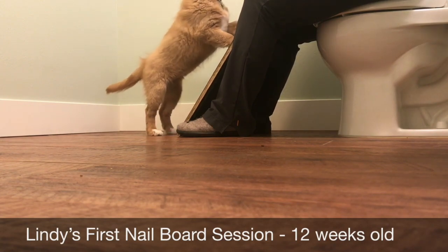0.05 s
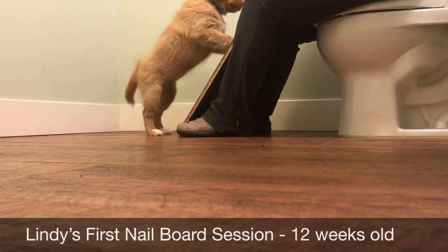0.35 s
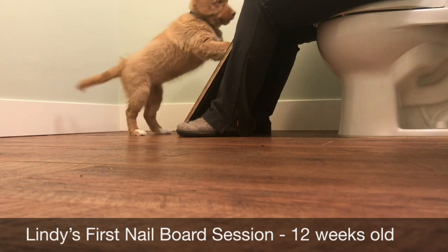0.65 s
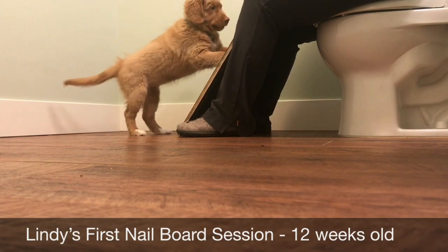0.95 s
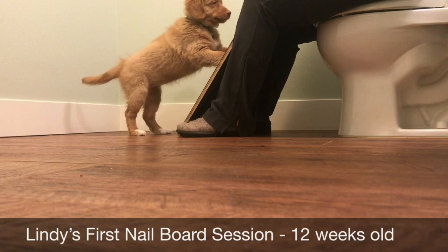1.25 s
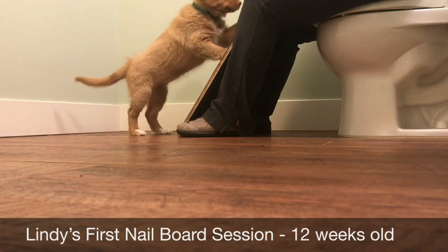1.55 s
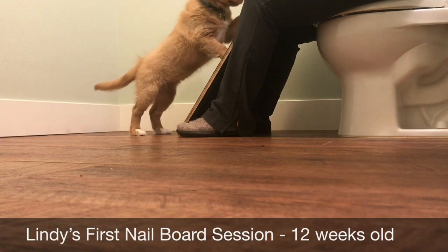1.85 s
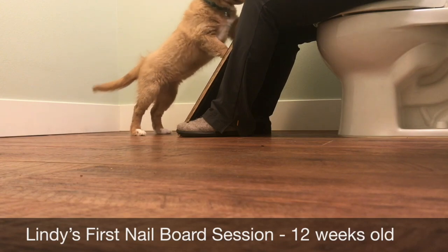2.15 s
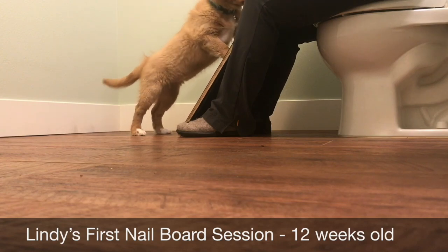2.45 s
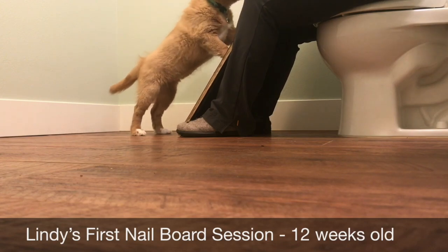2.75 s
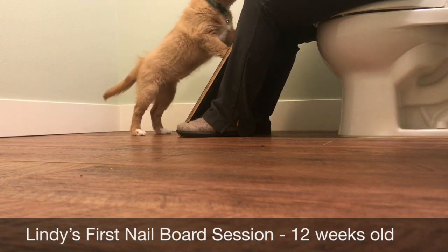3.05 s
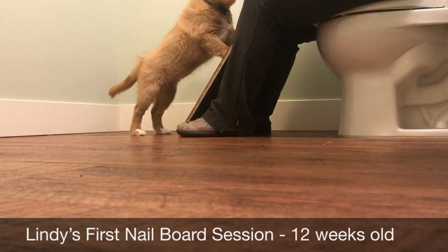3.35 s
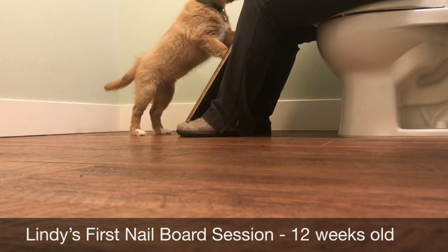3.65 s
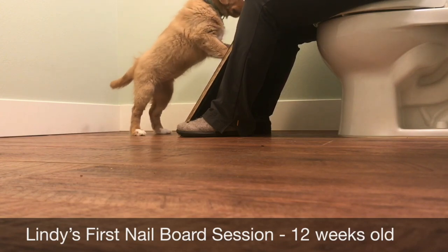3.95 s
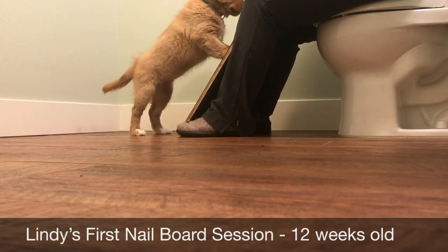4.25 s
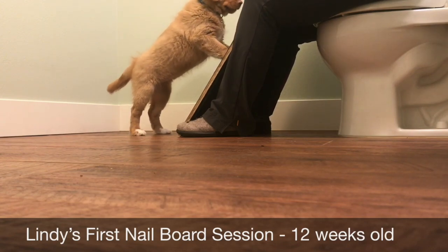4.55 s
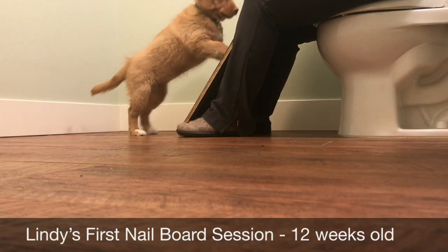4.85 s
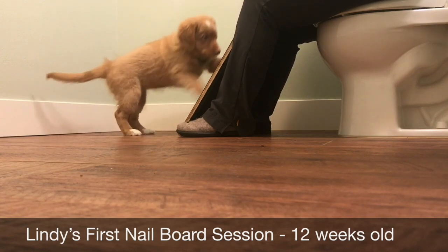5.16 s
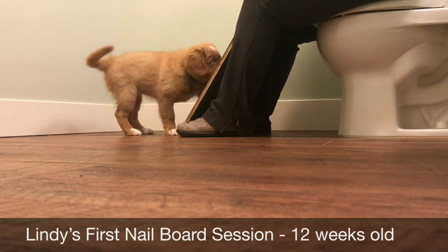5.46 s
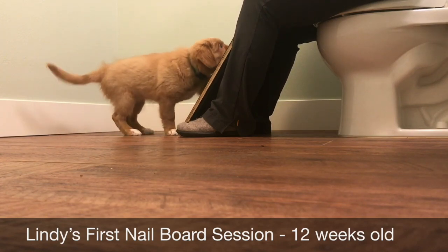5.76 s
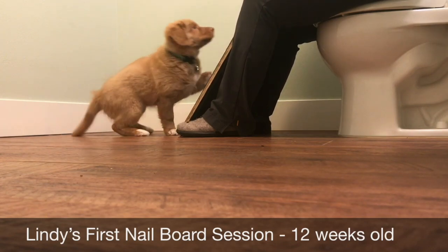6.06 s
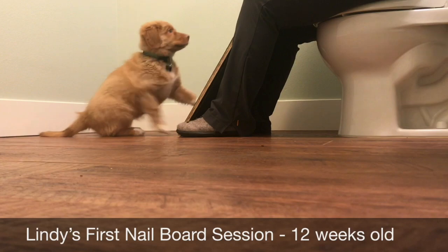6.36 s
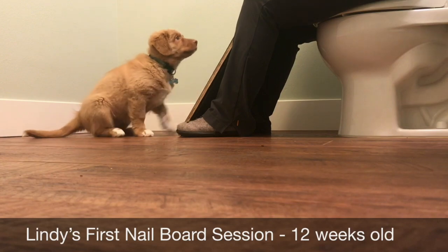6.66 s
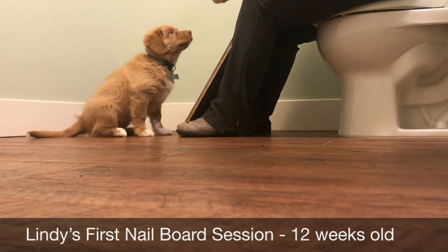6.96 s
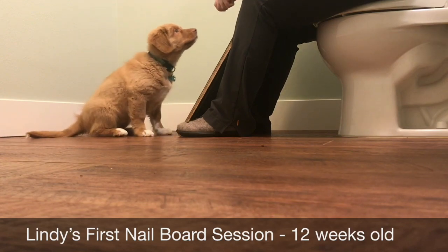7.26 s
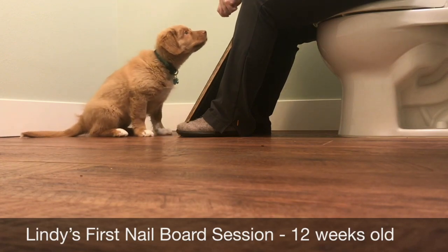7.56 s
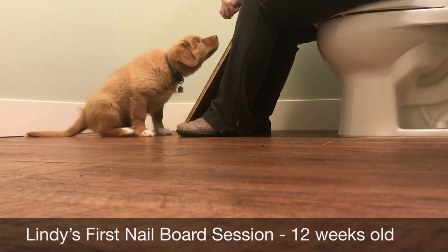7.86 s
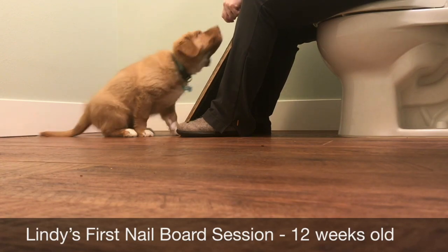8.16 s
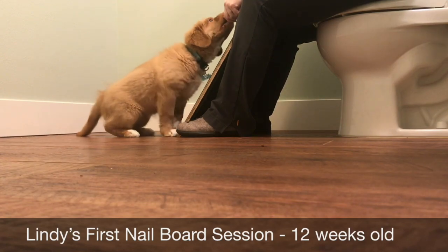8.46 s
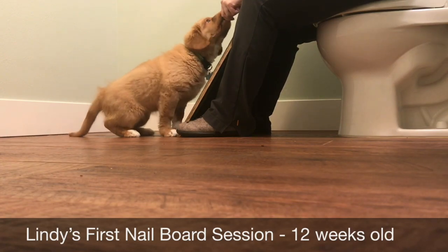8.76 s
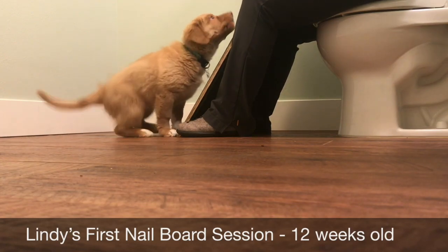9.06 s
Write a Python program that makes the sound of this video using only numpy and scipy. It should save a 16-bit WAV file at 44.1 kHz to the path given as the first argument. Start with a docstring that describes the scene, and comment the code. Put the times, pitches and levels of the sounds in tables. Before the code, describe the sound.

In a small, reverberant bathroom, a puppy's claws scratch a gritty board while its paws thump softly against it. A clicker snaps loudly down and up, then the scratching thins to light ticks and small lip smacks. The scraping builds again until a second double click, and ends in gentle knocks and a last few smacks. Faint room hiss lies underneath.

```python
"""Claws rasp and tick on grit as a puppy paws at a sandpaper-faced board leaning on its trainer's legs.
Stick-slip friction rings the board, while the paws' weight thumps its lowest modes. Twice the steel
tongue of a training clicker buckles down and springs back. Small wet mouth smacks come in between,
and a few soft knocks, most near the end. All but the thumps reverberate in a small, hard-walled
bathroom, over a faint rumble and hiss."""
import sys
import numpy as np
from scipy import signal
from scipy.fft import rfft, irfft
from scipy.io import wavfile

SR = 44100
rng = np.random.default_rng(int(sys.argv[2]) if len(sys.argv) > 2 else 0)


def generate_wav(sig):
    """Save sig (samples, or channels by samples) to the path in sys.argv[1] as 16-bit PCM at SR."""
    pcm = np.round(np.clip(np.atleast_2d(sig).T, -1, 1) * 32767).astype(np.int16)
    wavfile.write(sys.argv[1], SR, pcm)


N = 410571

# a front paw lands and drags down the board: (time [s], swell [s], scrape [dB], weight [dB])
PAW_STROKES = [(0.0, 0.013, -44.5, -45), (0.143, 0.016, -42, -43.5), (.28, 0.044, -51.5, -44),
               (0.437, 0.013, -42.5, -37.5), (0.548, .04, -43.5, -35.5), (0.724, 0.094, -38, -40.5),
               (1.15, 0.054, -52, -44), (1.414, 0.028, -43, -40.5), (1.684, 0.0049, -43.5, -33.5),
               (1.763, 0.0062, -40.5, -41), (1.8, 0.043, -28.5, -30), (2.016, .01, -44, -34.5),
               (2.141, 0.033, -27, -32), (2.451, 0.082, -32.5, -31), (3.2, .008, -54.5, -47),
               (3.71, .08, -43.5, -52), (4.828, 0.0065, -49.5, -41), (4.897, 0.02, -41.5, -47),
               (4.992, 0.054, -37, -37.5), (5.088, 0.07, -32.5, -35.5), (5.282, 0.018, -33, -29.5),
               (5.592, 0.035, -41.5, -46.5), (5.771, 0.0027, -38.5, -33), (5.876, 0.069, -30.5, -32.5),
               (6.191, 0.01, -34.5, -44), (6.257, 0.13, -30.5, -28.5), (6.456, .078, -26, -26),
               (7.475, 0.024, -65, -53), (7.876, 0.027, -58.5, -51.5), (8.04, .08, -58.5, -46.5),
               (8.184, 0.0046, -45.5, -30.5), (8.419, 0.072, -44.5, -38.5), (8.819, 0.092, -63, -59)]
# claws dragged over grit: (frequency [Hz], spectral density [dB])
RASP_SPECTRUM = [(30, -26), (60, 7.5), (105, 4.5), (175, -10.5), (260, -8.5), (450, -4), (750, -4),
                 (1250, -3.5), (1700, -6.5), (2400, -3.5), (3800, -2.5), (4700, -6.5), (6200, -7.5),
                 (8000, -14.5), (10500, -24.5), (13000, -28), (16000, -40.5)]
# resonances of the board under the claws: (frequency [Hz], width [Hz], lift [dB])
BOARD_RESONANCES = [(252.7, 72, 8.5), (330, 79, 2.5), (1458, 67, 8), (1840, 110, 1.5), (2251, 280, 6),
                    (4020, 430, 3.5), (5820, 500, 2)]
# the clearest catches of a claw: (time [s], level [dB])
CLAW_TICKS = [(.136, -43), (.452, -42), (.511, -37), (.596, -39), (.686, -38.5), (.923, -35.5),
              (1.076, -42.5), (1.13, -45), (1.229, -44), (1.409, -40.5), (1.441, -39), (1.686, -39),
              (1.826, -30.5), (2.184, -28), (3.206, -47.5), (3.356, -44), (3.732, -53), (3.975, -54),
              (4.755, -62.5), (5.561, -41.5), (8.857, -58)]
# a paw shifts its weight without scraping: (time [s], weight [dB])
WEIGHT_SHIFTS = [(.874, -40), (2.377, -32.5), (2.65, -39.5), (2.91, -49.5), (5.977, -31.5), (6.755, -29),
                 (7.703, -50), (8.112, -40), (9.12, -40.5), (9.164, -30.5)]
# bending modes of the leaning board: (frequency [multiple of the lowest], level [dB], T60 [s])
BENDING_MODES = [(1, 6, 0.42), (1.36, 0, 0.3), (1.601, -8.5, 0.24), (2.3, -26, 0.41), (4.1, -25, .5)]
# the clicker goes down or up: (time [s], level [dB], first contact softer by [dB],
# share of the pressed shape [0-1], pitch [factor], crack [dB], thumb damping [factor on widths])
CLICKS = [(2.2593, -15.5, 2.5, 0.99, 1.01, -15.5, 1.1), (2.4393, -14, 10.5, 0.01, .98, -10, .85),
          (6.3642, -13, 13, 0.96, 0.98, -14, 0.7), (6.5588, -16.5, 3.5, .15, 1.03, -2.5, 2.6)]
# modes of the steel tongue when pressed: (frequency [Hz], width [Hz], energy [dB])
PRESSED_MODES = [(1830, 170, -10.5), (3150, 490, -7.5), (4070, 500, -5), (4740, 420, -1.5),
                 (5790, 460, -7.5), (6940, 770, -10.5), (8500, 240, -13.5), (9900, 700, -17),
                 (13200, 1800, -17)]
# its modes when let go: (frequency [Hz], width [Hz], energy [dB])
RELEASED_MODES = [(1760, 280, -8.5), (2237, 360, -3), (2570, 150, 1.5), (3430, 81, -5.5), (4240, 880, -10),
                  (5425, 280, -10.5), (6850, 440, -19.5), (9700, 290, -18.5)]
# blows on board and floor: (time [s], level [dB], ring [Hz], ring lift [dB], tilt [dB/octave])
KNOCKS = [(.857, -42, 1446, 20, 9.5), (5.776, -29.5, 3010, 20, 5.5), (8.163, -32.5, 1047, 15.5, 2.5),
          (8.19, -42.5, 555, 11, 7), (8.402, -31.5, 810, 9.5, 2.5), (8.424, -36, 264, 25, -7.5),
          (9.189, -41, 915, 10, -8), (9.197, -50, 350, 19.5, -4)]
# colour common to the blows: (frequency [Hz], spectral density [dB])
KNOCK_SPECTRUM = [(90, -7.5), (260, -1), (420, 3), (900, -1.5), (1400, -4), (2100, -5.5), (2700, -13),
                  (4200, -21), (6000, -27), (9000, -35.5), (16000, -50.5)]
# smacks of tongue and lips: (time [s], level [dB], mouth resonance [Hz])
SMACKS = [(0.423, -55, 1040), (.612, -55, 990), (1.104, -47.5, 1080), (3.359, -51, 1247), (3.634, -54, 970),
          (4.287, -59, 1170), (4.427, -40, 1017), (4.459, -46.5, 900), (4.841, -46, 870), (8.721, -53, 966),
          (9.271, -48.5, 868)]
# reflections from nearby floor, board and walls: (delay [s], relative gain [factor])
ECHOES = [(.0011, 0.4), (.0023, -0.56), (.0036, -0.16), (.0047, 0.096), (.0061, -0.68), (0.01, 0.25),
          (0.018, .3), (0.0221, -.3), (.034, .25)]
# reverberation time of the bathroom: (frequency [Hz], T60 [s])
ROOM_T60 = [(100, 0.48), (260, .8), (700, 0.9), (1800, 0.8), (2500, 0.66), (3500, 0.74), (5000, 0.76),
            (8000, 0.61), (14000, 0.52)]
# background of the room: (frequency [Hz], spectral density [dB])
AIR_SPECTRUM = [(25, -7.5), (65, 3.5), (120, -3), (200, -11), (600, -13.5), (2700, -27), (4000, -23),
                (10000, -29.5), (13500, -27), (16000, -26.5)]

FADE_S = 0.077  # the claws lift off
TAPS = 4096  # length of a resonator's impulse response
HZ = np.fft.rfftfreq(TAPS, 1 / SR)


def scrapes(grains_per_s=4500, spread_db=3.0, chatter_db=3.5, chatter_s=0.0087, level_db=2):
    """Stick-slip friction: claws snap from grain to grain, and each snap rings the board."""
    out = np.zeros(N)
    colour = read(RASP_SPECTRUM, HZ) + sum(db * bump(hz, width) for hz, width, db in BOARD_RESONANCES)
    octaves = np.log2(np.maximum(HZ, 500) / 3000)
    snaps = (rng.random(N) < grains_per_s / SR) * rng.choice([-1, 1], N)
    snaps = snaps * amp(spread_db * np.minimum(rng.exponential(1, N), 4))
    uneven_grip = np.interp(np.arange(N) / SR / chatter_s, np.arange(N), rng.standard_normal(N))
    snaps *= amp(chatter_db * uneven_grip)
    for s, swell, db, weight_db in PAW_STROKES:
        t = np.arange(int((swell + FADE_S) * SR)) / SR
        pressure = np.sin(np.pi / 2 * np.interp(t, [0, swell, swell + FADE_S], [0, 1, 2])) ** 0.81
        grit = unit(snaps[round(s * SR):][:len(t)]) * np.sqrt(len(t))
        harder_db, heavier_db = db + 43.5, weight_db + 40.5  # relative to a plain stroke
        tilt = 0.274 * harder_db - 0.17 * heavier_db  # force brightens the grit, the pad muffles it
        body = 0.19 * heavier_db * bump(hz=270, width=290)  # weight wakes the board's body
        board = causal(colour + tilt * octaves + body)
        add(out, s, amp(db + level_db) * signal.fftconvolve(grit * pressure, board))
    return out


def claw_ticks(ring_hz=3260, upper_ratio=1.37, q=5, top_hz=6200, level_db=27.5):
    """Impulse excitation: a hard claw tip catches on the grit and rings at two resonances."""
    out, ticks = np.zeros(N), list(CLAW_TICKS)
    for s, swell, db, _ in PAW_STROKES:
        for when, size in rng.random((2, 2)):  # two small catches where the stroke presses hardest
            catch_s = s + swell / 2 + when * (swell + FADE_S) / 2
            catch_db = db - 6.5 + 2.5 * (2 * size - 1)
            ticks.append((catch_s, catch_db))
    for (s, db), hz in zip(ticks, varied(ring_hz, spread=0.078, count=len(ticks))):
        rings = amp(band(hz, q)) + amp(band(hz * upper_ratio, q))
        tip = causal(20 * np.log10(rings) - 10 * np.log10(1 + (HZ / top_hz) ** 8))
        add(out, s, amp(db + level_db) * unit(signal.fftconvolve(tip, contact(touch_s=0.0018))))
    return out


def thumps(lowest_hz=63.45, rise_s=0.011, weight_lag_s=0.012, radiation_hz=46, level_db=2):
    """Modal vibration: a padded paw loads the board gradually, so only its lowest modes swing."""
    out, t = np.zeros(N), np.arange(SR // 2) / SR
    loads = [(s + weight_lag_s, weight_db) for s, _, _, weight_db in PAW_STROKES] + list(WEIGHT_SHIFTS)
    for (s, db), hz in zip(loads, varied(lowest_hz, spread=0.06, count=len(loads))):
        swing = np.zeros(len(t))
        for ratio, mode_db, t60 in BENDING_MODES:
            mode_hz = hz * ratio * (1 + 0.068 * rng.uniform(-1, 1) * (ratio - 1))
            swing += amp(mode_db - 60 * t / t60) * np.sin(2 * np.pi * mode_hz * t)
        swing *= 1 - np.exp(-(t / rise_s) ** 2)
        add(out, s, amp(db + level_db) * swing / abs(swing).max())
    # the small board cannot radiate deeper bass
    return signal.sosfilt(signal.butter(4, radiation_hz, "high", fs=SR, output="sos"),
                          signal.sosfilt(signal.butter(4, radiation_hz, "high", fs=SR, output="sos"),
                                         out)[::-1])[::-1]


def clicker(travel_s=0.0035, level_db=31):
    """Snap-through buckling: a steel tongue gives way, then hits its stop, in a double crack."""
    out = np.zeros(N)
    for s, db, softer_db, pressed, pitch, crack_db, damping in CLICKS:
        give = tongue_snap(pressed, pitch, crack_db + 8, damping * 1.3)  # more crack, less ring
        stop = tongue_snap(pressed, pitch, crack_db, damping)
        add(out, s, amp(db - softer_db + level_db) * give)
        add(out, s + travel_s, amp(db + level_db) * stop)
    return out


def tongue_snap(pressed, pitch, crack_db, damping, low_hz=1200):
    """Damped free vibration: the steel cracks and rings, high when pressed, lower when let go."""
    t = np.arange(TAPS) / SR
    snap = amp(crack_db) * causal(2 * band(hz=2150, q=0.88))
    for modes, share in (PRESSED_MODES, pressed), (RELEASED_MODES, 1 - pressed):
        ring = np.zeros(TAPS)
        for k, (hz, width, db) in enumerate(modes):
            decay = np.exp(-np.pi * width * damping * t)
            ring += (-1) ** k * amp(db) * unit(decay * np.sin(2 * np.pi * hz * pitch * t))
        snap += np.sqrt(share) * unit(ring)
    return unit(signal.sosfilt(signal.butter(3, low_hz, "high", fs=SR, output="sos"), snap))


def knocks(ring_q=8, level_db=31):
    """Impact: each light blow of paw or claw excites one resonance, set by where it lands."""
    out = np.zeros(N)
    octaves = np.log2(np.maximum(HZ, 300) / 1000)
    for s, db, hz, ring_db, tilt in KNOCKS:
        body = causal(read(KNOCK_SPECTRUM, HZ) + ring_db * bump(hz, hz / ring_q) + tilt * octaves)
        add(out, s, amp(db + level_db) * unit(signal.fftconvolve(body, contact(touch_s=0.0023))))
    return out


def smacks(q=3, click_db=-38, level_db=29):
    """Cavity resonance: the tongue parts from the palate with a wet click, and the mouth pops."""
    out = np.zeros(N)
    for s, db, hz in SMACKS:
        pop = amp(2 * band(hz, q))
        wet_click = amp(click_db + band(hz * 3, q=0.072))
        add(out, s, amp(db + level_db) * causal(20 * np.log10(pop + wet_click)))
    return out


def room(x, near_db, wet_db, build_s=0.0023):
    """Reverberation: direct sound, early echoes, and a diffuse tail whose midrange lasts longest."""
    t = np.arange(SR) / SR
    hz, times, spectra = signal.stft(rng.standard_normal(SR), SR, nperseg=256)
    decay = amp(-60 * times / read(ROOM_T60, hz)[:, None])
    tail = signal.istft(spectra * decay, SR, nperseg=256)[1][:SR]
    response = amp(wet_db) * unit(tail * (1 - np.exp(-t / build_s)))
    response[0] += 1
    for delay, gain in ECHOES:
        response[round(delay * SR)] += amp(near_db) * gain
    return signal.fftconvolve(x, unit(response))[:N]


def air(level_db=-62.5):
    """Stationary noise: the faint rumble and hiss of the room."""
    colour = amp(read(AIR_SPECTRUM, np.fft.rfftfreq(N, 1 / SR)))
    noise = irfft(rfft(rng.standard_normal(N)) * colour, N)
    return amp(level_db) * unit(noise) * np.sqrt(N)


def contact(touch_s):
    """All-pass dispersion: a scuff spreads a blow over milliseconds without colouring it."""
    u = np.arange(TAPS // 4) / SR / touch_s
    swell, force = u * np.exp(-u), rng.standard_normal(len(u))
    for _ in range(2):
        spectrum = rfft(force * swell)
        force = irfft(spectrum / (abs(spectrum) + 1e-12))
    return unit(force)


def causal(db):
    """Minimum phase: the sharp-fronted impulse response with this spectrum, of energy one."""
    cepstrum = irfft(np.log(amp(np.maximum(db, db.max() - 100))))
    cepstrum[1:TAPS // 2] *= 2
    cepstrum[TAPS // 2 + 1:] = 0
    return unit(irfft(np.exp(rfft(cepstrum))))


def bump(hz, width):
    """Lorentzian resonance curve, 1 at its centre."""
    return 1 / (1 + (2 * (HZ - hz) / width) ** 2)


def band(hz, q):
    """Second-order band-pass resonance, in dB."""
    return -10 * np.log10(1 + (q * ((HZ + 1) / hz - hz / (HZ + 1))) ** 2)


def varied(hz, spread, count):
    """Uniform scatter: a slightly different frequency for each event."""
    return hz * (1 + spread * rng.uniform(-1, 1, count))


def read(points, hz):
    """Interpolation of a table on a log-frequency axis."""
    f, value = np.transpose(points)
    return np.interp(np.log(hz + 1), np.log(f + 1), value)


def amp(db):
    """Decibels to amplitude ratio."""
    return 10 ** (np.asarray(db) / 20)


def unit(x):
    """Normalisation to an energy of one."""
    return x / np.sqrt(np.sum(x ** 2) + 1e-30)


def add(mix, s, sound):
    """Superposition of a sound at time s."""
    part = mix[round(s * SR):][:len(sound)]
    part += sound[:len(part)]


def scene():
    """Direct-to-reverberant ratio: ticks are fairly dry, the hidden clicker is mostly reflection."""
    mix = room(scrapes(), near_db=-11, wet_db=2)
    mix += room(claw_ticks(), near_db=-8, wet_db=-1)
    mix += room(smacks(), near_db=2.5, wet_db=7)
    mix += room(knocks(), near_db=10.5, wet_db=12.5)
    mix += room(clicker(), near_db=1, wet_db=5.5)
    return (mix + thumps() + air())[None]


def record(dry):
    """Band limiting: a steep low-pass removes the highest treble."""
    low_pass = signal.firwin(511, 15900, window=("kaiser", 9), fs=SR)
    return signal.oaconvolve(dry, low_pass[None], "same")


dry = scene()
out = record(dry)
generate_wav(out)
```